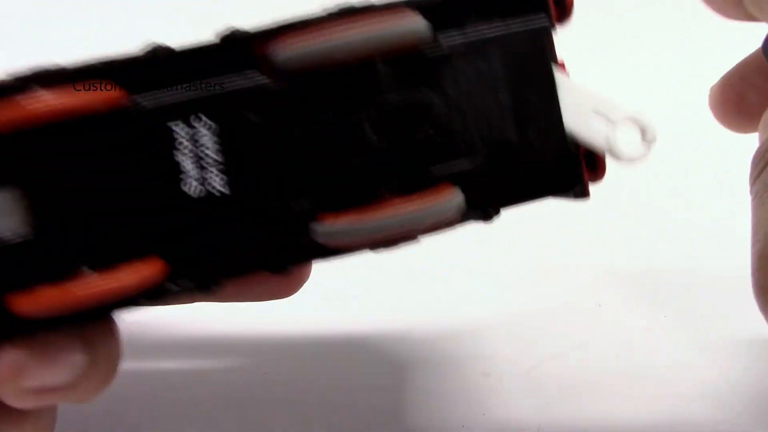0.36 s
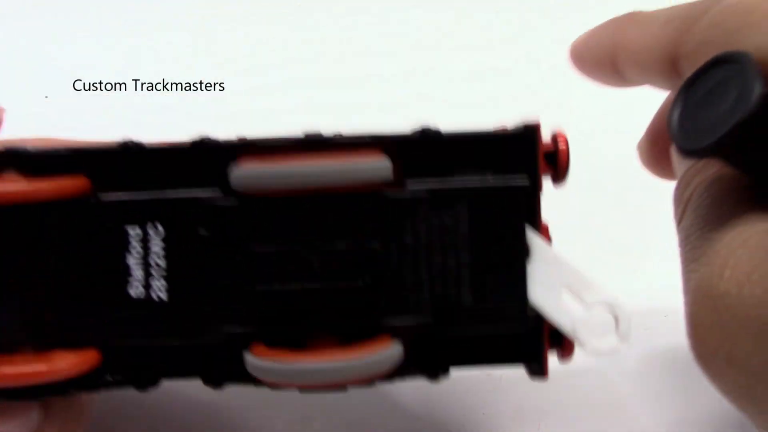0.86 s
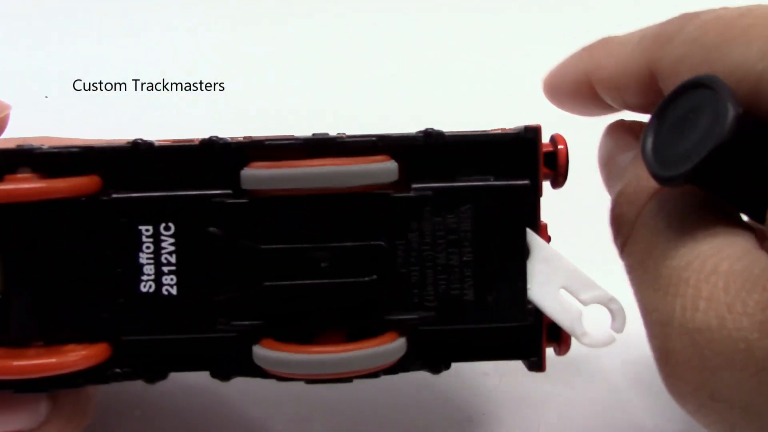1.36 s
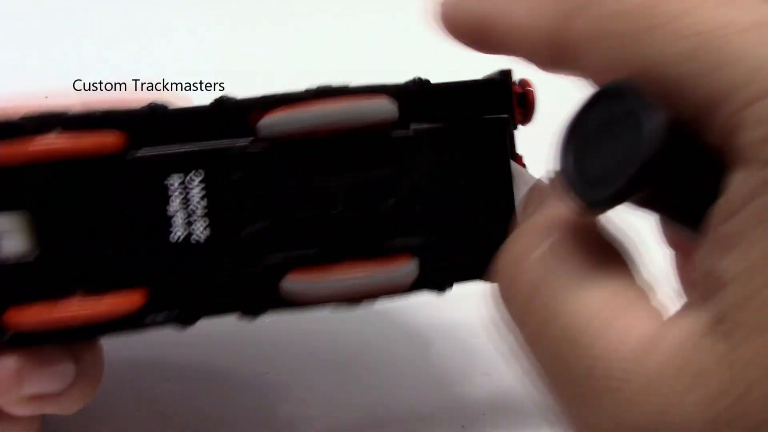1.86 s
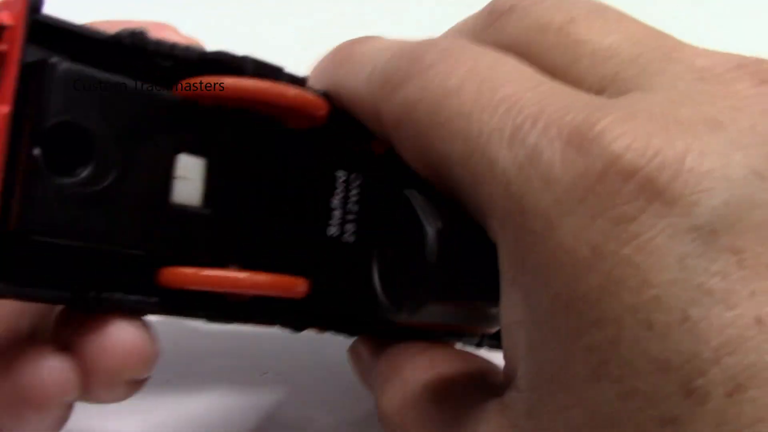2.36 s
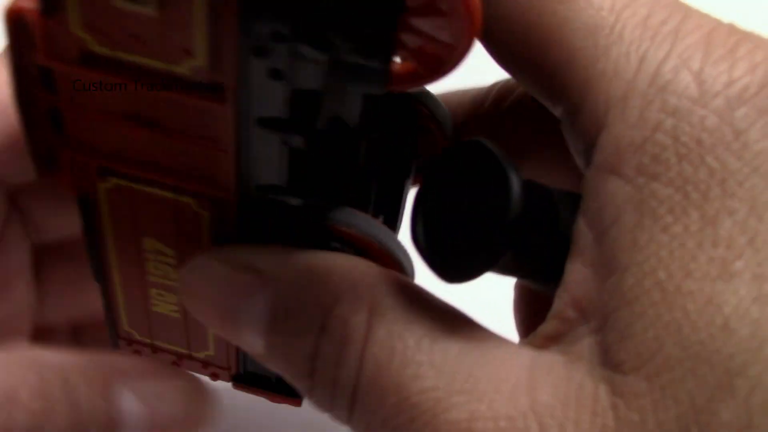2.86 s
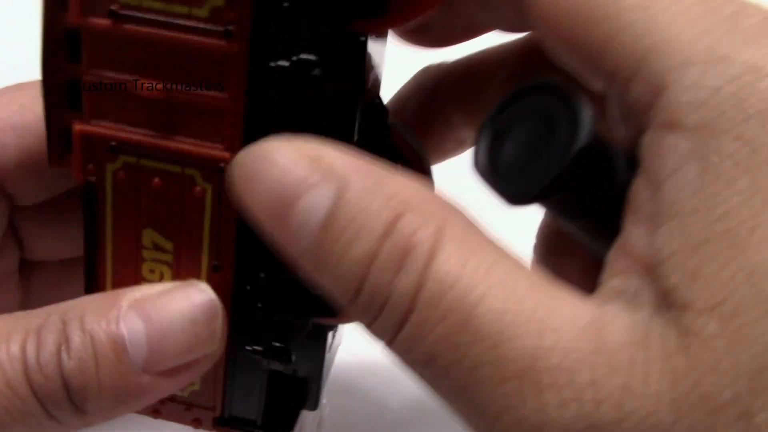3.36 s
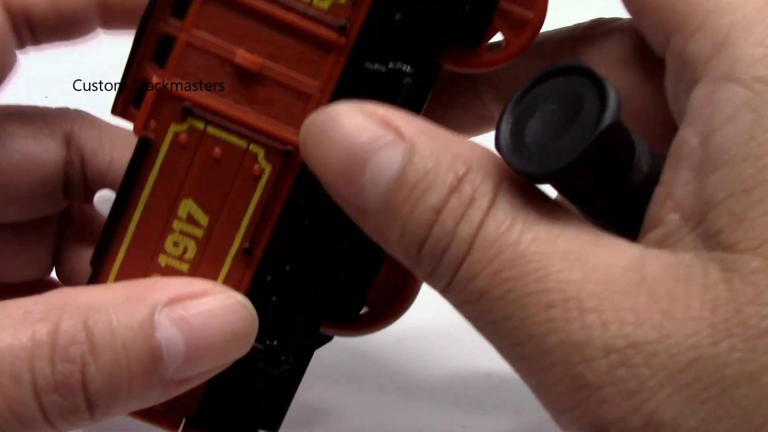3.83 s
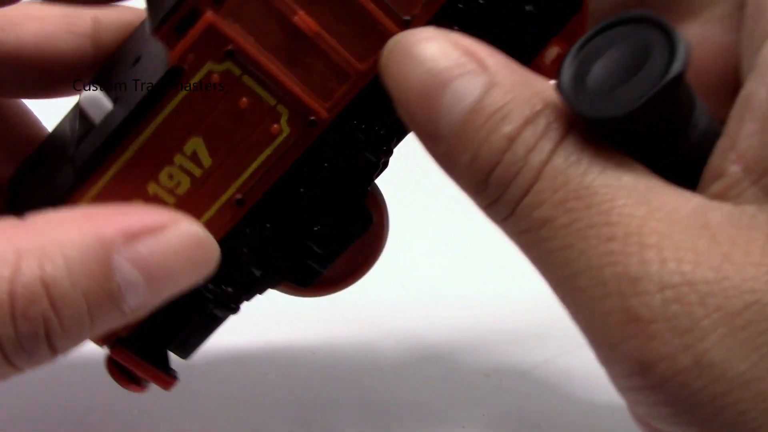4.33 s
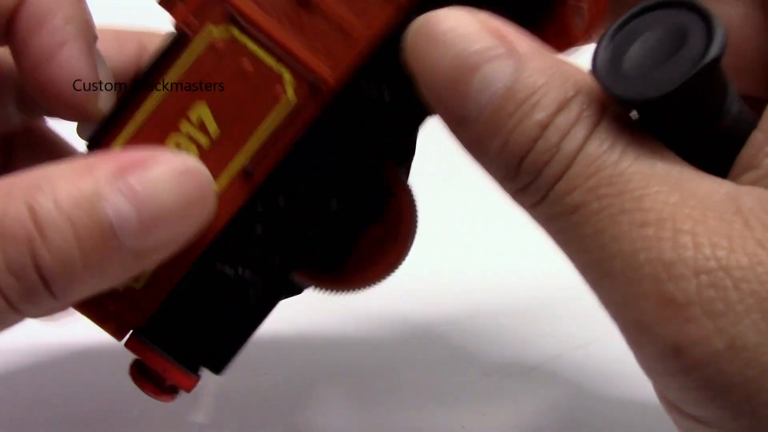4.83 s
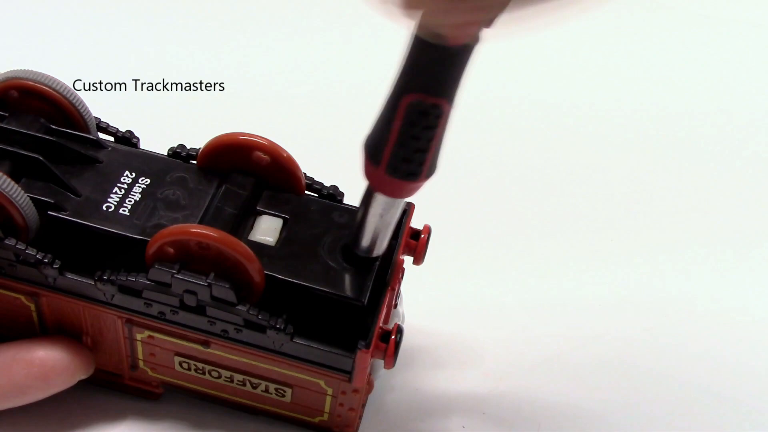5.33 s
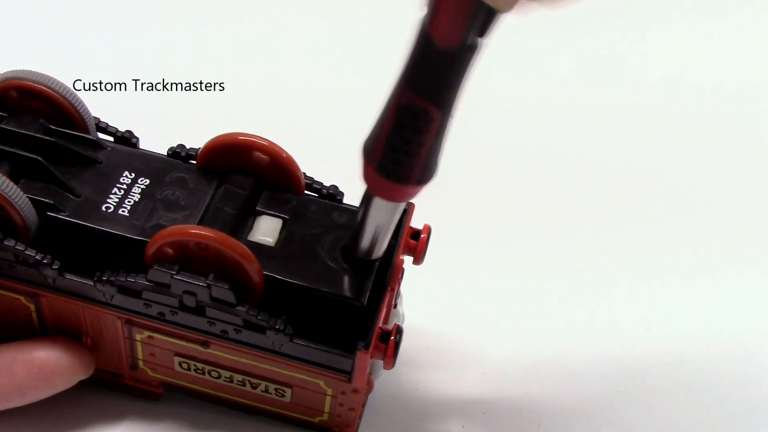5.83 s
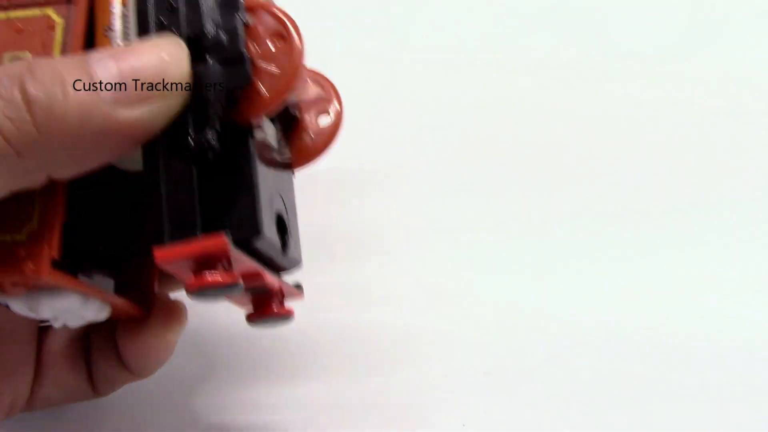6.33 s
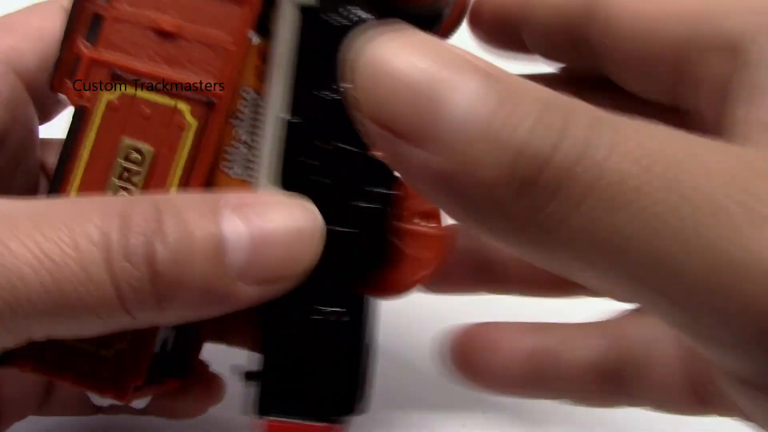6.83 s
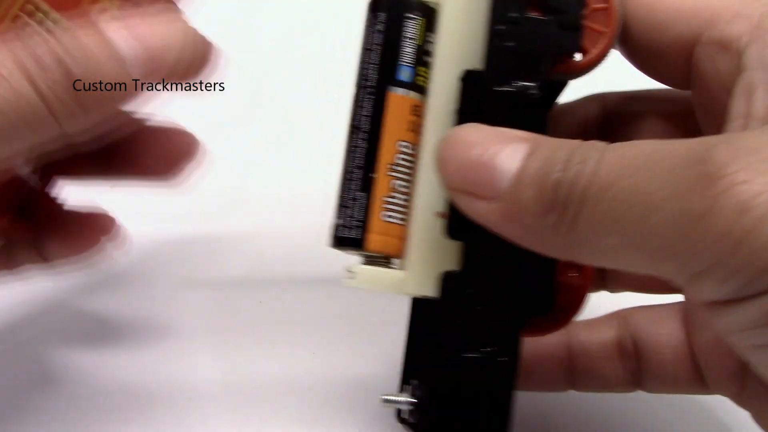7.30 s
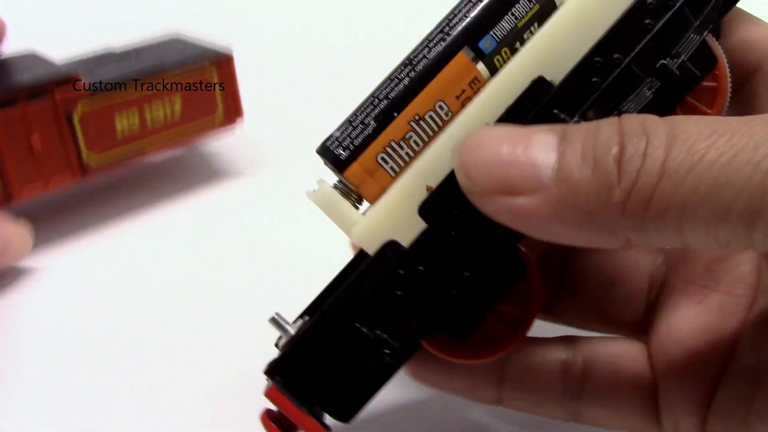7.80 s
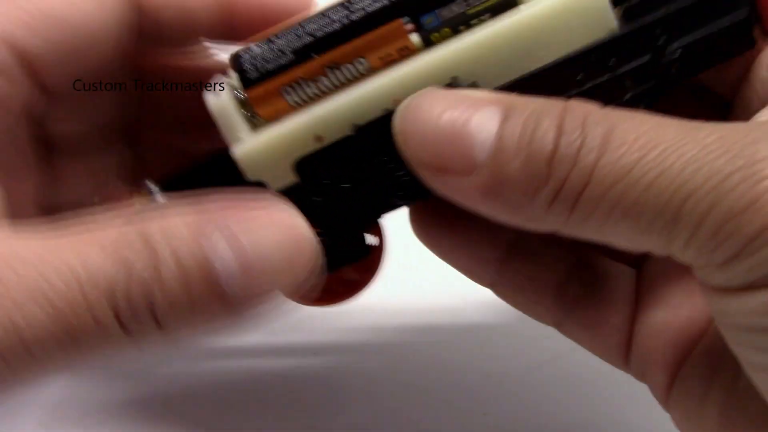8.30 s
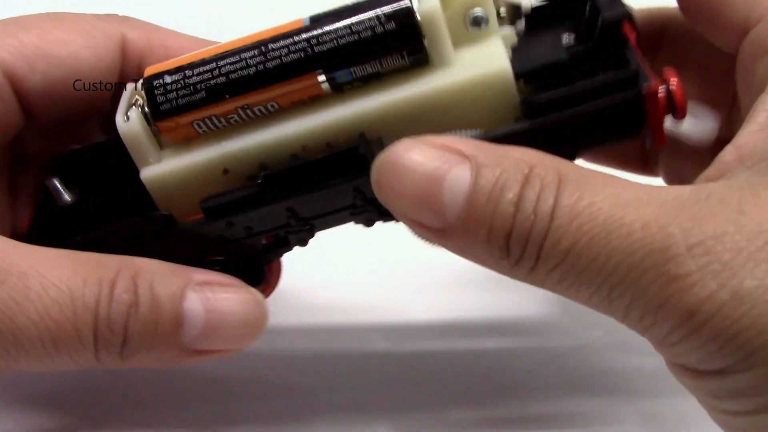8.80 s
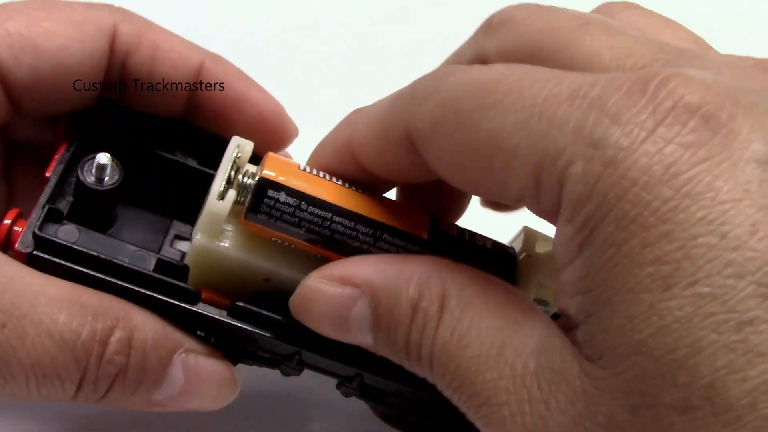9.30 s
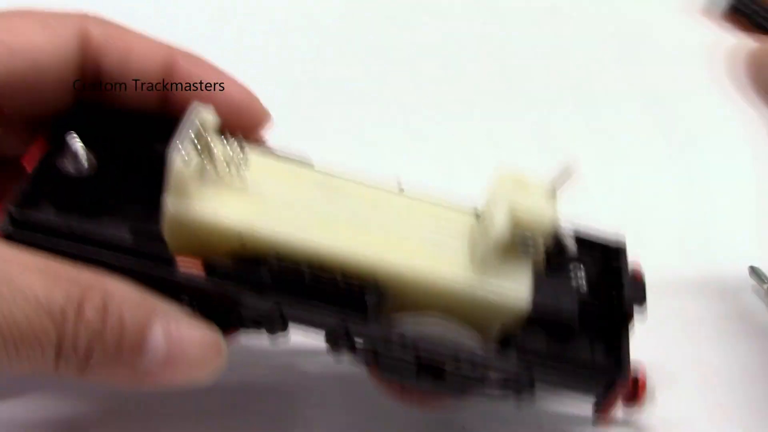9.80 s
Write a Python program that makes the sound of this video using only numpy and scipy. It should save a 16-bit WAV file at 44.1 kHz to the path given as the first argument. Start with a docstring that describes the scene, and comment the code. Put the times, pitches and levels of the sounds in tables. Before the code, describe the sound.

Close microphone, small room, steady soft hiss. From 0 s a battery toy locomotive runs in the hand: loud, buzzy plastic gear clatter and grind, its hollow resonances shifting as it is turned. Around 2 s a thumb drags on it briefly, dulling the clatter; from 2.6 to 3.1 s a stronger drag pulls the pitch far down into a labouring grind before it springs back. At 4.65 s comes a loud knock, then switch-off; gears slow and stumble out by 5.05 s. Plastic clacks and a heavy put-down thump come at 5.2 s. At 5.35 s sound cuts out for an instant and fades back without the motor. Screwdriver-like knocks and rubbing follow, with hard blows near 6.05 and 6.45 s, shell clicks and a tiny catch ping around 6.8-7.2 s, a loud clack at 8.0 s, then sparse snaps and crisp clusters at 9.1 and 9.5 s.

```python
"""Plastic gears clatter and grind close by as a battery toy locomotive runs in the hand, slows under a
thumb and coasts to a stop; hands then knock it on a table, rub it, work a screwdriver and unlatch the shell.
Gear knocks and noise drive shell resonances that change with the grip; knocks and clicks are short
resonant bursts, rubbing is grainy noise, and steady room noise lies behind. The sound drops out at one
edit, just after the handling has begun, and fades back in without the motor."""
import sys
import numpy as np
from scipy import signal
from scipy.fft import rfft, irfft
from scipy.io import wavfile
from scipy.ndimage import uniform_filter1d, minimum_filter1d

SR = 44100
rng = np.random.default_rng(int(sys.argv[2]) if len(sys.argv) > 2 else 0)


def volts_from_db(level):
    """Convert decibel levels to linear amplitude ratios."""
    exponent = np.asarray(level, float) / 20
    return 10 ** exponent


def master_out(mix):
    """Clip the mix to full scale and print it as 16-bit PCM to the path in sys.argv[1]."""
    frames = np.transpose(np.atleast_2d(mix))
    ceiling = np.clip(frames, -1, 1)
    pcm = np.round(ceiling * 32767).astype(np.int16)
    wavfile.write(sys.argv[1], SR, pcm)


N = 437031  # length in samples
OFF_S, CUT_S = 4.69, 5.348  # motor switched off; edit drops to silence


def motor():
    """The gear train's knocks and grind shake the shell; an unbalanced shaft adds a faint hum."""
    t = np.arange(N) / SR
    powered = t < OFF_S - 0.012
    load, turns = thumb_load(t), shaft_turns(t)
    drive = gear_drive(turns, load, powered)
    shell = gripped_shell(drive, t)
    hum = volts_from_db(-56) * np.sin(2 * np.pi * turns) * powered * (1 - load)
    return (shell + hum) * (t < CUT_S)


def thumb_load(t):
    """Load on the gears from 0 to 1: a little when idling, much more while a thumb drags on the wheels."""
    # thumb on the wheels: (start [s], end [s], added load [0-1])
    thumb = [(1.979, 2.15, 0.9), (2.613, 3.078, 1)]
    ramp_s, load = 0.02, 0.027
    for start, end, drag in thumb:
        load = load + drag * np.clip(np.minimum(t - start, end - t) / ramp_s + 0.5, 0, 1)
    return np.clip(load, 0, 1)


def shaft_turns(t):
    """Shaft angle in turns: speed follows a table, then falls evenly to a creep once switched off."""
    # motor shaft under power: (time [s], speed [turns/s])
    shaft_speed = [(0, 131.85), (0.9, 135.19), (1.8, 136.84), (1.95, 133.39), (2.05, 128.02), (2.3, 131.83),
                   (2.45, 128.4), (2.56, 131.31), (2.68, 95.28), (2.8, 74.69), (2.95, 57.81), (3.03, 76.09),
                   (3.12, 121.43), (3.25, 126.95), (3.4, 130.3), (4.0, 125.38), (4.45, 128.32),
                   (4.64, 127.79), (4.69, 115.7)]
    drag_hz_per_s, creep_hz, start_turn = 289, 15, -1.0
    coasted = np.maximum(t - OFF_S, 0)
    speed = np.maximum(curves(shaft_speed)[0] - drag_hz_per_s * coasted, creep_hz)
    return start_turn + np.cumsum(speed) / SR


def gear_drive(turns, load, powered):
    """Force on the shell: every gear knock is a blunt push and a short rattle, over the grind of teeth."""
    # strength of the gear train: (time [s], relative level [dB])
    gear_level = [(0, -11.5), (0.3, -15.5), (0.8, -18), (1.3, -15.5), (1.9, -13.5), (2.05, -18),
                  (2.22, -11.5), (2.5, -14.5), (2.62, -13), (3.0, -16.5), (3.12, -13), (4.05, -11.5),
                  (4.6, -13), (4.75, -25.5), (5.0, -34.5), (5.34, -19.5)]
    train = backlash_knocks(turns, powered) * (1 - 0.9 * load)  # load takes up the backlash
    grind = tooth_grind(turns, load)
    u = np.arange(600) / (0.0012 * SR)  # time in units of the rattle's 1.2 ms decay
    rattle = (1 - np.exp(-5.9 * u)) * np.exp(-u)
    push = 1.324 * np.exp(-((u - 0.12) / 0.07) ** 2)

    # level the mixture to follow the table
    power = uniform_filter1d((signal.oaconvolve(train, rattle)[:N] + grind) ** 2, 9000)
    strength = volts_from_db(curves(gear_level)[0]) / np.sqrt(power + 1e-9)
    train = train * strength
    grind = grind * strength * np.where(powered, 1, volts_from_db(-0.5))

    add_late_knocks(train, turns)
    envelope = signal.oaconvolve(train, rattle)[:N] + grind
    return envelope * rng.standard_normal(N) + signal.oaconvolve(train, push)[:N]


def backlash_knocks(turns, powered):
    """Loose teeth knock once a turn, in a seven-turn pattern as the same teeth meet, then faintly rebound."""
    # knock in each of the seven turns: (relative level [dB])
    teeth_db = [0, -18, -1, -8, -14, -11, -17]
    draws = rng.standard_normal((int(turns[-1]) + 8, 4))
    train = np.zeros(N)
    for k, (lag, db) in enumerate([(0, 3.5), (0.55, -19)]):  # knock, rebound: (lag [turns], dB)
        at = np.flatnonzero((np.diff(np.floor(turns - lag)) > 0) & powered[1:])
        turn = np.floor(turns[at + 1]).astype(int)
        usual_db = np.take(teeth_db, turn % 7) * (1 - k) + db  # only the knock has the pattern
        size_db = usual_db + (1.3 - 0.09 * usual_db) * draws[turn, k]  # faint knocks vary most
        jitter = np.round(8 * draws[turn, k + 2]).astype(int)  # a few samples early or late
        train[np.maximum(at + jitter, 0)] += volts_from_db(np.minimum(size_db, 1.5))
    return train


def tooth_grind(turns, load):
    """Meshing teeth grind harder under load, in a surge that throbs with the shaft."""
    idle = 0.35 * np.cos(2 * np.pi * turns - 1) + 0.3 * np.cos(4 * np.pi * turns)
    surge = 2.5 * np.exp(-2.5 * (turns % 1)) - 1  # sudden once a turn, then dying
    throb = 1 + (1 - load) * idle + 0.5 * load * surge
    return throb * volts_from_db(-28 + 15 * load)


def add_late_knocks(train, turns):
    """One loud knock just before switch-off; then the slack gears knock once a turn and stumble at last."""
    # one loud knock just before switch-off, then the last stumbling knocks: (time [s], level [dB])
    late_knocks = [(4.657, 4.5), (4.8918, -5.5), (4.8993, 3.5), (4.9368, 1.5), (4.982, -9), (5.0083, -7),
                   (5.025, -11.5)]
    count, usual_db, spread_db = 16, 4.5, 2.5
    slack = np.searchsorted(turns, turns[round(OFF_S * SR)] + np.arange(count))
    train[slack] = volts_from_db(usual_db + spread_db * rng.standard_normal(count))
    at, db = np.transpose(late_knocks)
    train[np.round(at * SR).astype(int)] = volts_from_db(db)


def gripped_shell(drive, t):
    """The plastic shell rings at resonances that shift with each grip, and dulls as the gears coast."""
    # the toy is turned to a new grip: (time [s])
    turned_s = [0.268, 0.831, 1.958, 2.611, 2.83, 3.07, 4.252]
    # one list of shell resonances per grip: (frequency [Hz], width [Hz], relative level [dB])
    grips = [
        [(1040, 110, -18), (1814, 37, -1), (2680, 200, -12), (3380, 180, -14), (4210, 160, -14.5),
         (5330, 120, -15), (6320, 630, -10.5), (6700, 58, -17), (7520, 35, -9)],
        [(1070, 360, -16), (1770, 28, 0), (2100, 38, -7), (2730, 240, -1), (3577, 220, 0.5), (5370, 160, -6.5),
         (6150, 77, 0.5), (7260, 1500, -1.5), (10900, 290, -13.5)],
        [(1050, 330, -17.5), (1752, 41, -2), (2755, 130, -6), (3670, 71, -9), (3950, 50, -14.5),
         (4780, 59, -12), (5970, 260, -6.5), (6855, 230, 1), (10400, 440, -19.5)],
        [(1130, 68, -21), (1757, 120, -2.5), (2140, 69, -10.5), (2840, 140, -10.5), (3690, 394, -9),
         (4300, 46, -6), (5850, 75, -2.5), (6640, 190, -2.5), (8500, 510, -8)],
        [(1790, 70, -11), (2530, 290, 0), (3770, 280, -3.5), (5700, 160, -2), (6260, 140, -0.5),
         (6680, 110, -4.5), (7520, 140, -18), (8800, 800, -15), (9300, 210, -9), (10700, 1200, -16.5)],
        [(1780, 60, -7.5), (2400, 240, -5), (3000, 200, -8), (3800, 410, 1.5), (5600, 200, -5.5),
         (6150, 150, -1.5), (7500, 300, -8.5), (9200, 200, -10), (10700, 630, -15.5)],
        [(1080, 240, -37.5), (1719, 75, 1), (2210, 130, -4), (3055, 350, -4.5), (3680, 170, -4.5),
         (5000, 190, -6), (5820, 160, -3), (6350, 210, -4.5), (8000, 280, -7), (12450, 430, -47.5)],
        [(1146, 120, -19.5), (1730, 55, -5.5), (2195, 88, -7), (3610, 210, -1.5), (4600, 75, -10.5),
         (4800, 190, -13), (6200, 120, -10), (7500, 100, -1.5), (8870, 160, -12.5), (11740, 280, -25)],
    ]
    # how far each grip bares the treble: (treble gain [dB])
    grip_treble_db = [-1.5, -0.5, 0.5, -1.5, 2, 2, -3.5, -1]
    # shell response between the resonances: (frequency [Hz], relative level [dB])
    shell_floor = [(180, -63.5), (300, -26), (574, -26.5), (1120, -11.5), (1360, -31.5), (1720, -5),
                   (1970, -13.5), (3640, -10), (4670, -10), (6850, -2), (16000, -37)]
    grip = uniform_filter1d(np.searchsorted(turned_s, t).astype(float), 5000)
    sound = np.zeros(N)
    for k, resonances in enumerate(grips):
        share = np.sqrt(np.clip(1 - abs(grip - k), 0, 1))  # crossfade to neighbouring grips

        def response(hz):
            power = volts_from_db(2 * read(shell_floor, hz) - 8) + peaks(resonances, hz)
            return small(hz) * np.sqrt(power)

        sound += coloured(share * drive, response)
    dulling_db = -26 * np.minimum(np.maximum(t - OFF_S, 0), 0.4)  # 26 dB/s for 0.4 s
    treble_db = np.interp(grip, np.arange(len(grips)), grip_treble_db) + dulling_db
    return tilted(sound, 2200, treble_db)


def small(hz):
    """A shell this small hardly radiates bass: gain steps down below 700 Hz."""
    return 0.08 + hz ** 6 / (hz ** 6 + 700 ** 6)


def knocks():
    """Toy and tools struck on the table: a table thud under the plastic's ring and snap."""
    # blows: (time [s], thud level [dB], shell ring level [dB], snap level [dB], ring frequency [Hz])
    blows = [(5.2065, -26.5, -14.5, -16, 1730), (5.2267, -6.5, -20, -9, 900), (5.242, -10, -11, -8.5, 1140),
             (5.299, -27, -22.5, -25, 2540), (5.433, -30.5, -21.5, -23.5, 724),
             (5.468, -37, -23.5, -40.5, 1030), (5.4886, -24.5, -19, -39.5, 1230),
             (5.5224, -25, -28, -38, 1170), (5.7098, -25.5, -18.5, -13.5, 706),
             (5.7684, -25, -19, -17.5, 710), (5.787, -25, -7.5, -21.5, 1570),
             (5.8201, -31, -22, -35.5, 1190), (5.8738, -41, -28.5, -41, 710),
             (5.8973, -33.5, -27, -24, 730), (5.9834, -29, -24.5, -52, 714), (5.998, -45, -31, -51, 700),
             (6.0432, -6.5, -1, -15.5, 1060), (6.054, -15, 1.5, -6.5, 1180),
             (6.1386, -34, -34, -53.5, 1200), (6.2177, -39.5, -30, -52, 1090),
             (6.229, -26, -27, -26.5, 1070), (6.3255, -26.5, -33, -54, 730),
             (6.4436, -1.5, -9.5, -26, 1690), (6.4787, -13, -29, -48, 1680),
             (6.7188, -30.5, -31.5, -29, 1680), (6.8078, -39, -4, -5.5, 1640), (6.968, -31, -40, -52, 700),
             (7.0019, -26.5, -23, -21.5, 940), (7.162, -23, -23.5, -24.5, 1550),
             (7.168, -19.5, -23, -48, 900), (7.187, -27, -30, -33.5, 1670), (7.8213, -22.5, -16, -21, 1760),
             (7.8471, -25.5, -35, -33.5, 1360), (7.88, -28, -23.5, -36, 1280),
             (8.0018, -5, 4.5, -16.5, 1280), (8.034, -12.5, -18.5, -16.5, 1320),
             (9.0559, -21, -16.5, -4, 830), (9.08, -18.5, -23.5, -7, 1610), (9.1066, -19.5, -42, -19, 790),
             (9.1695, -35.5, -29.5, -27, 980), (9.4988, -32, -15.5, 3, 1130), (9.522, -3.5, -8.5, -1, 990),
             (9.545, -20, -36, -8.5, 1110)]
    # table-top modes: (frequency [Hz], relative level [dB], decay setting [s], longer = narrower)
    table_modes = [(113.8, -15, 0.14), (189, -6, 0.11), (254.2, 2.5, 0.43), (266.5, -1.5, 0.27),
                   (349, -0.5, 0.12), (566, -8, 0.02), (745, -6, 0.049)]
    mix, t = np.zeros(N), np.arange(7000) / SR
    modes = [(hz, 5.4 / decay, db) for hz, db, decay in table_modes]
    for s, thud_db, ring_db, snap_db, ring_hz in blows:
        thud = volts_from_db(thud_db) * struck(modes, t, 0.071, blunt=2.87)
        decay_s = 0.034 * np.exp(0.02 * (ring_db + 15.5))  # a harder knock rings longer
        add(mix, s, thud + plastic(t, ring_db, snap_db, ring_hz, 3276, decay_s))
    return mix


def hand_thump():
    """A soft, heavy thump of a hand: one broad low resonance, struck bluntly."""
    # the thump: (level [dB], frequency [Hz], width [Hz], t60 [s])
    thump = (-5.5, 172, 130.5, 0.18)
    mix, t = np.zeros(N), np.arange(7000) / SR
    db, hz, width, t60 = thump
    add(mix, 5.2262, volts_from_db(db) * struck([(hz, width, 0)], t, t60, blunt=2.7))
    return mix


def clicks():
    """Plastic parts click in the hands: shell ring and snap, with no table beneath."""
    # (time [s], shell ring level [dB], snap level [dB], snap frequency [Hz])
    part_clicks = [(5.0538, -26, -31, 3580), (5.065, -21.5, -20.5, 6300), (5.1359, -41, -22, 2510),
                   (5.1536, -23.5, -21.5, 3600), (5.172, -20, -16, 5600), (5.308, -16, -10, 4470),
                   (5.335, -13.5, -8, 6220), (5.5299, -12.5, -17.5, 2780), (6.1182, -24, -33, 2840),
                   (6.3702, -28, -28.5, 2890), (6.816, -22, -11, 6550), (6.8243, -25, -11.5, 7600),
                   (6.8484, -26, -9, 5460), (6.877, -36.5, -24, 6230), (7.0917, -20, -19.5, 5900),
                   (7.151, -30.5, -31.5, 2680), (7.204, -30, -14.5, 2870), (7.2137, -35.5, -8.5, 2800),
                   (7.2528, -46, -24.5, 7000), (7.2687, -53, -19, 6300), (7.348, -52.5, -24, 5700),
                   (7.5742, -34, -33, 7400), (7.6012, -44, -27.5, 4040), (7.67, -58, -34.5, 2920),
                   (7.948, -59, -34.5, 4000), (8.041, -25, -17, 4300), (8.2297, -62, -30.5, 4470),
                   (8.3858, -43, -28, 6600), (8.42, -49, -23.5, 6460), (8.4275, -30, -8.5, 6850),
                   (8.4568, -28.5, -14, 7300), (8.538, -39, -37, 3000), (8.6814, -35.5, -21, 3900),
                   (8.747, -54, -24.5, 6660), (8.7608, -39.5, -6, 7100), (8.7768, -61, -18.5, 3650),
                   (8.784, -57.5, -20, 4300), (8.9324, -41, -16, 4400), (8.9385, -26, -10.5, 5900),
                   (9.0485, -44, -9.5, 7800), (9.0692, -32, -7, 5800), (9.0817, -45, 2, 6600),
                   (9.1148, -25.5, -16.5, 6400), (9.1439, -36, -14.5, 3590), (9.1948, -44, -33, 3160),
                   (9.295, -50, -41.5, 5000), (9.337, -52, -30, 6300), (9.3847, -37.5, -29, 6360),
                   (9.425, -44, -38.5, 4030), (9.4915, -40, -21, 3270), (9.506, -27, -1, 3380),
                   (9.551, -25, -9, 7520), (9.5863, -44, -21, 3090), (9.6157, -28, -27, 3320),
                   (9.6628, -48, -34, 6500), (9.6747, -31.5, -17, 6270), (9.696, -34, -20.5, 6320)]
    mix, t = np.zeros(N), np.arange(7000) / SR
    for s, ring_db, snap_db, snap_hz in part_clicks:
        add(mix, s, plastic(t, ring_db, snap_db, 1590, snap_hz, 0.025))
    return mix


def catch_pings():
    """A catch pings as it lets go: a decaying sine."""
    # (time [s], level [dB])
    pings = [(7.204, -21), (7.2132, -12)]
    mix, t = np.zeros(N), np.arange(7000) / SR
    ping_hz, t60 = 2870, 0.048
    for s, db in pings:
        add(mix, s, volts_from_db(db - 60 * t / t60) * np.sin(2 * np.pi * ping_hz * t))
    return mix


def plastic(t, ring_db, snap_db, ring_hz, snap_hz, decay_s):
    """Struck plastic: the shell's modes ring with one stressed pitch, under a bright snap."""
    # plastic modes: (frequency [Hz], relative level [dB], decay setting [s], longer = narrower)
    plastic_modes = [(830, 3, 0.23), (1130, 3.5, 0.025), (1300, -6.5, 0.027), (1630, 2, 0.019),
                     (1690, 0, 0.052), (2237, -4.5, 0.096)]
    shell = [(hz, 8.1 / decay, db) for hz, db, decay in plastic_modes]
    ring = struck(shell + [(ring_hz, 110, 9)], t, 0.55 * decay_s)
    snap_modes = [(snap_hz, 2500, -11), (7500, 5000, -16), (snap_hz, 0.06 * snap_hz, -2)]
    snap = struck(snap_modes, t, 0.49 * decay_s)
    return volts_from_db(ring_db) * ring + volts_from_db(snap_db) * snap


def struck(modes, t, t60, blunt=0):
    """A rough blow, dying in t60 with a fainter rattle behind it, through the given resonances; peak 1."""
    decay = volts_from_db(-60 * t / t60) + volts_from_db(-20 - 60 * t / (3.5 * t60))
    attack = np.minimum(t / 0.0011, 1)
    burst = (rng.standard_normal(len(t)) + blunt * np.exp(-t / 0.00065)) * decay * attack

    def response(hz):
        bass_loss = hz ** 2 / (hz ** 2 + (0.5 * modes[0][0]) ** 2)
        return np.sqrt(peaks(modes, hz)) * bass_loss / (1 + (hz / 9500) ** 4)

    sound = coloured(burst, response)
    return sound / abs(sound).max()


def rubbing():
    """Fingers and parts rub: dense tiny slips over a soft hiss, swelling and fading with each stroke."""
    # strokes: (peak time [s], relative level [dB], treble gain [dB], time to fade 20 dB [s], 0.02 at least)
    rub_strokes = [(5.05, -42, 9, 0.9), (5.27, -36, -3, 0.6), (5.53, -43, -6.5, 0.1), (5.8, -40, -14, -0.4),
                   (6.09, -31, -4, 0), (6.25, -36, -7.5, -0.4), (6.85, -33, 2.5, 0.14),
                   (7.0, -38.5, -6.5, 0.3), (7.15, -37.5, -2, 0.2), (7.7, -54, 10, .15),
                   (7.81, -47.5, 8.5, 0), (7.87, -42, -2, 0.18), (8.05, -44, -1, -0.02),
                   (8.3, -53, 8.5, 0.3), (8.425, -43, 7.5, 0.02), (8.76, -44.5, 7, 0.03),
                   (9.089, -32.5, 3.5, -0.0046), (9.52, -27.5, 7.5, 0.04), (9.7, -43, 7, .1)]
    # colour of the rubbing: (frequency [Hz], relative level [dB])
    rub_colour = [(120, -23), (200, -12), (777, -12), (1350, -18), (1590, -24.5), (2130, -18), (3070, -18),
                  (6280, -19.5), (16000, -46.5)]
    t = np.arange(N) / SR
    strokes = []
    for s, db, _, fade in rub_strokes:
        away = np.maximum((s - t) / 0.69, t - s)  # the rise is a little quicker than the fade
        strokes.append(db - 20 * away / max(fade, 0.02))
    level_db = np.maximum(np.max(strokes, axis=0), -61.5)  # a faint rub between strokes
    treble_db = curves(rub_strokes)[1]

    slips = volts_from_db(8.9 * np.minimum(rng.exponential(1, N), 4)) * (rng.random(N) < 400 / SR)  # 400 a second
    grain = signal.lfilter([1], [1, -np.exp(-1 / (0.0035 * SR))], slips)  # each dies over 3.5 ms
    rough = (0.68 + evened(grain)) * rng.standard_normal(N)
    sound = evened(coloured(rough, lambda hz: volts_from_db(read(rub_colour, hz))))
    return volts_from_db(level_db - 5.0) * tilted(sound, 2500, treble_db) * (t > 4.95)


def air():
    """Steady room noise: a coloured hiss and a few fuzzy tones made of narrow noise bands."""
    # colour of the hiss: (frequency [Hz], relative level [dB])
    air_colour = [(15, -52), (25, -12), (99, -4), (195, -2.5), (354, 2), (476, -5.5), (863, -10),
                  (1130, -23), (1790, -15), (2480, -23), (6560, -28), (9070, -27), (16000, -57.5)]
    # fuzzy tones in the room: (frequency [Hz], width [Hz], level [dB])
    fuzzy_tones = [(126, 54, -63), (329, 130, -55.5), (1800, 80, -69)]
    noise = coloured(rng.standard_normal(N), lambda hz: volts_from_db(read(air_colour, hz)))
    hiss = volts_from_db(-50) * evened(noise)
    for hz, width, db in fuzzy_tones:
        tone = coloured(rng.standard_normal(N), lambda f: peaks([(hz, width, 0)], f), size=8192)
        hiss += volts_from_db(db) * evened(tone)
    return hiss


def room(x):
    """Sparse reflections and a short tail that decays at its own rate in each band; two outputs."""
    # reverberation: (frequency [Hz], t60 [s])
    room_t60 = [(120, 0.44), (330, 0.11), (870, 0.22), (2300, 0.19), (6060, 0.13)]
    taps = rng.standard_normal((2, SR // 3)) * (rng.random((2, SR // 3)) < 0.05)
    taps[:, :60] = 0  # gap before the first reflection
    hz, t, z = signal.stft(taps, SR, nperseg=256)
    decay = volts_from_db(-60 * t / read(room_t60, hz)[:, None])
    tail = signal.istft(z * decay, SR, nperseg=256)[1]
    return signal.fftconvolve(x[None], tail / np.linalg.norm(tail[0]), axes=1)[:, :N]


def evened(x):
    """Scales to rms 1."""
    return x / np.sqrt(np.mean(x ** 2) + 1e-20)


def read(points, hz):
    """Reads a spectrum on a log-frequency axis."""
    f, value = np.transpose(points)
    return np.interp(np.log(hz + 1), np.log(f + 1), value)


def curves(rows):
    """Every column after the time, drawn out to every sample."""
    s, *columns = np.transpose(rows)
    return [np.interp(np.arange(N) / SR, s, c) for c in columns]


def add(mix, s, sound):
    """Mixes a sound in at s seconds."""
    part = mix[round(s * SR):][:len(sound)]
    part += sound[:len(part)]


def coloured(x, gain, size=4096):
    """Causal minimum-phase filter shaped by a gain function of Hz; white noise keeps its level."""
    log = np.log(gain(abs(np.fft.fftfreq(size, 1 / SR))) + 1e-5)
    taps = np.fft.ifft(np.exp(log - 1j * signal.hilbert(log).imag)).real[:size // 2]
    return signal.oaconvolve(x, taps / np.linalg.norm(taps))[:len(x)]


def tilted(sound, split_hz, treble_db):
    """Lifts or dulls what lies above the split by a moving gain."""
    low = signal.sosfilt(signal.butter(2, split_hz, fs=SR, output="sos"), sound)
    return low + volts_from_db(treble_db) * (sound - low)


def peaks(resonances, hz):
    """Summed power of (Hz, width Hz, dB) resonances with steep skirts."""
    return sum(volts_from_db(2 * db) / (1 + (2 * (hz - f) / w) ** 2) ** 1.146 for f, w, db in resonances)


def scene():
    """Close, nearly centred sources in a small room; the edit drops to silence and fades back in."""
    # stereo width: (frequency [Hz], gain of the side signal [dB])
    side_gain = [(60, -16.5), (150, -24), (380, -11.5), (950, -30.5), (2380, -32), (5980, -16),
                 (15000, -15)]
    near = motor() + knocks() + hand_thump() + clicks() + catch_pings() + rubbing()
    tail, spread = room(near)
    mid = near + volts_from_db(-14.5) * tail + air()
    side = 0.12 * near + 0.5 * spread + 0.6 * air()
    hz = np.fft.rfftfreq(N, 1 / SR)
    side = irfft(rfft(side) * volts_from_db(read(side_gain, hz)), N)
    t = np.arange(N) / SR
    fade_in = np.clip((t - CUT_S - 0.008) / 0.11, 0, 1)  # 8 ms of silence, then a 0.11 s fade
    return np.array([mid + side, mid - side]) * np.where(t < CUT_S, 1, fade_in)


def roll_off(x):
    """The treble ends steeply here."""
    return signal.sosfilt(signal.butter(12, 16260, fs=SR, output="sos"), x)


def record(dry):
    """The microphone loses deep bass; a fast limiter holds knocks near full scale, flattening the tips."""
    dry = signal.sosfilt(signal.butter(2, 35, "high", fs=SR, output="sos"), dry)
    peak = -minimum_filter1d(-abs(dry).max(0), 90)  # largest within about 2 ms
    gain = uniform_filter1d(1 / np.maximum(peak / 1.02, 1), 45)
    return roll_off(np.clip(dry * gain, -1, 1))


dry = scene()
out = record(dry)
master_out(out)
```